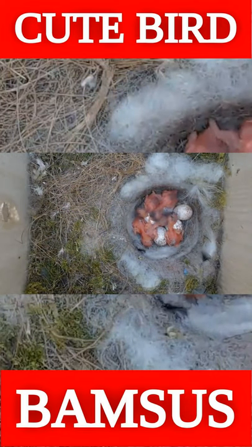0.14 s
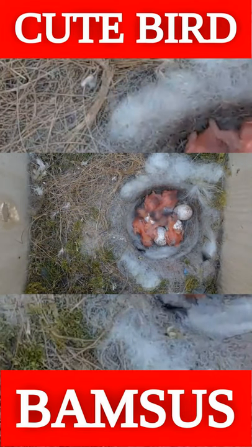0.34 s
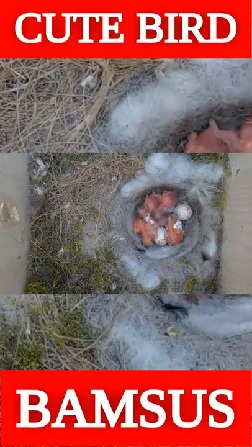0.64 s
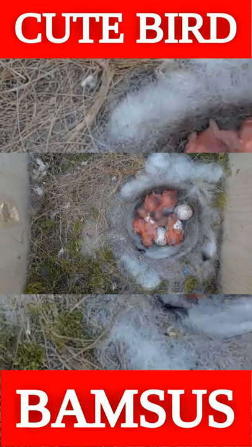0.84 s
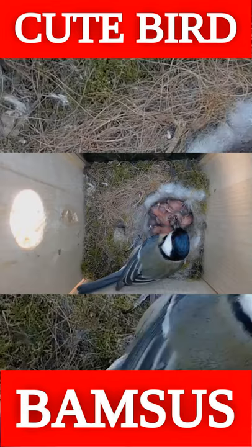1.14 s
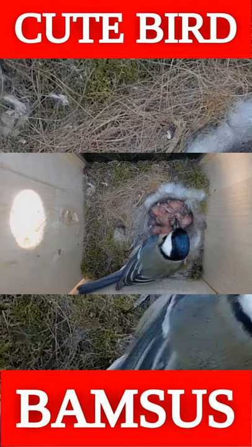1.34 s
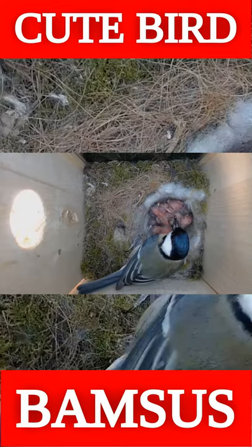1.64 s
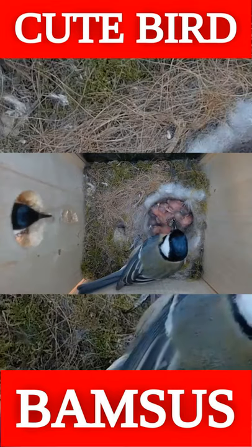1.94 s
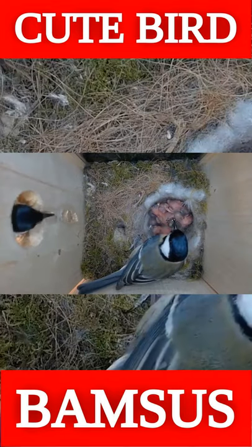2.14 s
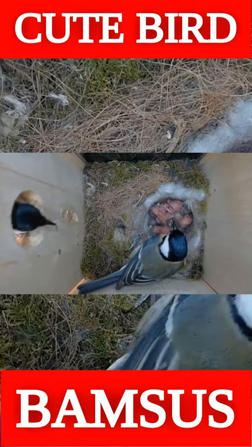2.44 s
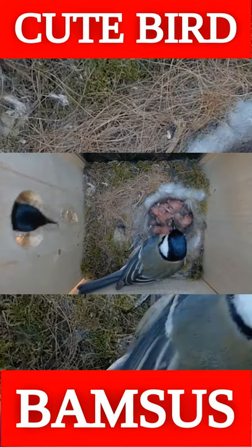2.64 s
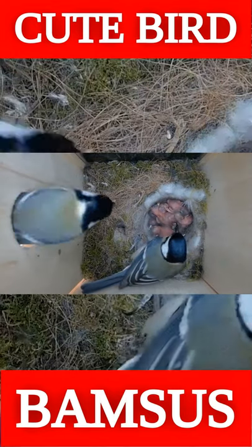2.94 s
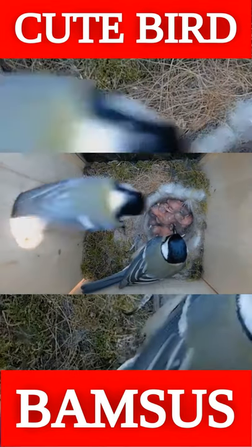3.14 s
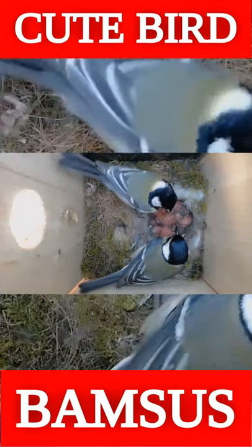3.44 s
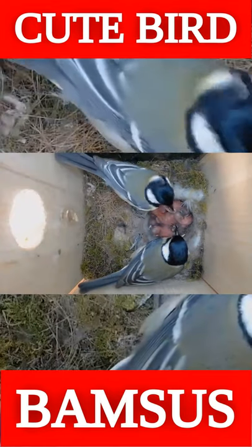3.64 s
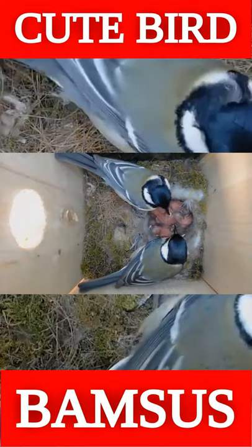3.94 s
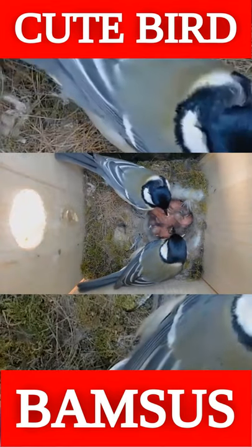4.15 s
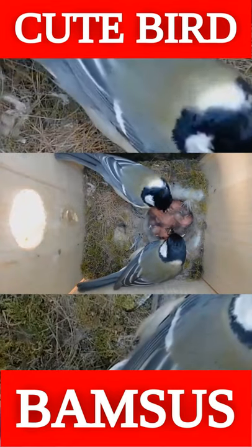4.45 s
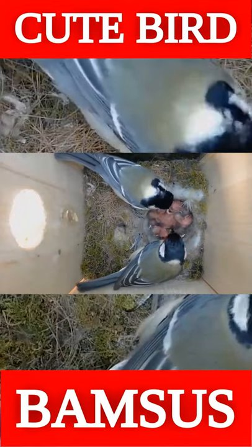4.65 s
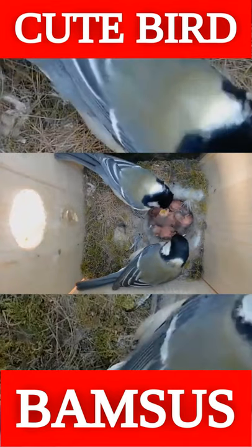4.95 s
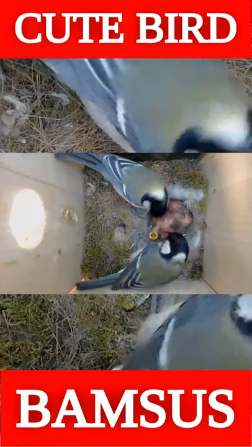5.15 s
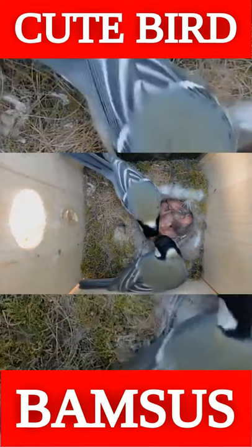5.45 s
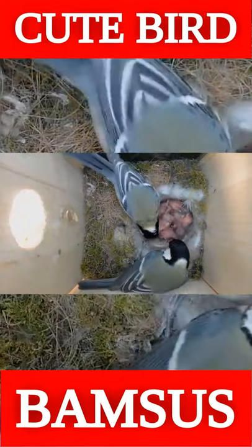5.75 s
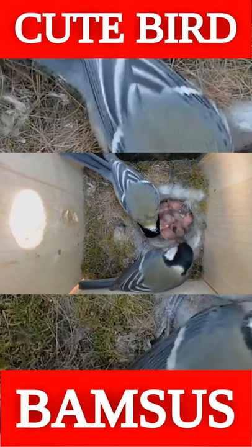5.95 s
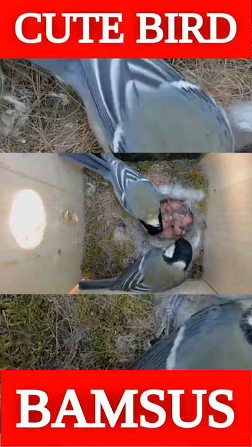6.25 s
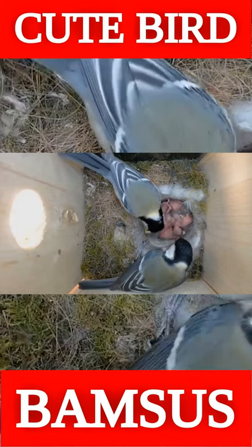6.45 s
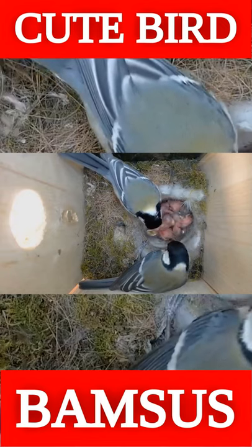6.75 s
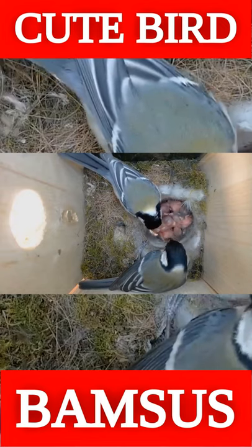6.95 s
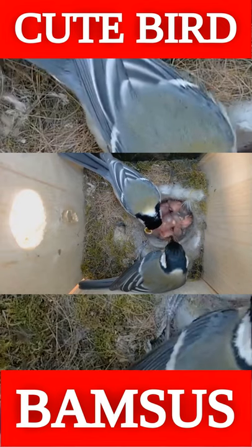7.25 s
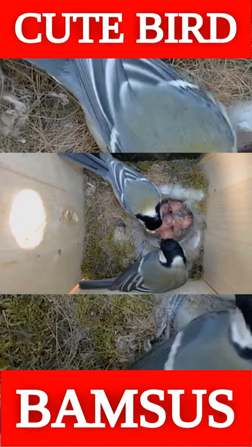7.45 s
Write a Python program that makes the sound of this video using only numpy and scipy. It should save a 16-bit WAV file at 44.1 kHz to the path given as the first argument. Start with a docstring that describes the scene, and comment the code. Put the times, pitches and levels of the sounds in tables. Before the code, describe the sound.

A parent bird arrives in a nest box: after a second of quiet hiss, two strong woody knocks boom through the floor, followed by lighter treads, ticks and a straw rustle. Later landing scuffs are softer. One pure high chirp precedes three rapid groups of buzzy upward calls, the middle one loudest, each trailing into soft breathy hiss. Tiny nestling peeps, faint whine, close microphone.

```python
"""Inside a wooden nest box, close to a small camera microphone: modes, resonances and coloured noise in stereo.
First a bright hiss with faint scuffs; as it ends the level dips briefly, and outdoor air, hum and whine remain.
A parent bird lands at the hole: knocks and scuffs ring wall modes, treads boom, straw grains rustle in the nest.
Then nestlings peep in thin arched sine glides, with two level whistles among the first of them.
Three bursts of raspy rising calls, probably the parent's feeding calls, are frequency-modulated harmonics;
each burst trails into resonant noise."""
import sys
import numpy as np
from scipy import signal
from scipy.fft import rfft, irfft, next_fast_len
from scipy.io import wavfile
from scipy.ndimage import uniform_filter1d

SR = 44100
rng = np.random.default_rng(int(sys.argv[2]) if len(sys.argv) > 2 else 0)


def waveform_to_disk(signal):
    """Save audio, clipped to [-1, 1], as 16-bit WAV at the path in sys.argv[1]."""
    frames = np.transpose(np.atleast_2d(signal))
    scaled = np.clip(frames, -1, 1) * 32767
    samples = np.round(scaled).astype(np.int16)
    wavfile.write(sys.argv[1], SR, samples)


N = 335601
T = np.arange(N) / SR   # time, s

# Levels in the tables are relative; the functions add offsets or normalise the power.
# low rumble, spectrum: [f/Hz, level/dB]
RUMBLE_COLOUR = [(15, -42), (25, -21.5), (38, -15), (70, -9.5), (86, -0.5), (124, 5.5), (162, -1.5),
                 (188, -14), (272, -33), (330, -42.5), (430, -53.5), (730, -120)]
# low rumble in the box, envelope: [t/s, level/dB]
RUMBLE_LEVEL = [(0, -65), (1.17, -66.5), (1.35, -52.5), (1.7, -63), (2.55, -59), (2.9, -70.5), (4.7, -68),
                (5.9, -71), (7.6, -71)]
# outdoor air, spectrum: [f/Hz, level/dB]
AIR_COLOUR = [(150, -44.5), (250, -31.5), (393, -15), (754, -16.5), (983, -4.5), (1090, -5.5), (1270, -0.5),
              (1510, -12), (2330, -17), (2970, -34.5), (6000, -47), (7800, -78), (13200, -120)]
# resonances excited by the outdoor air: [f/Hz, width/Hz, level/dB]
AIR_MODES = [(420, 35, 2), (620, 57, 5.5), (985.3, 4.4, -0.5), (1236, 37, -6), (1836, 97, -7),
             (2292, 51, -7.5)]
# outdoor air dying down, envelope: [t/s, level/dB]
AIR_LEVEL = [(1.15, -62), (2.3, -66.5), (3.0, -72), (4.5, -78), (7.6, -83)]
# brighter hiss of the opening second, spectrum: [f/Hz, level/dB]
OPENING_COLOUR = [(150, -47), (250, -21), (291, -33), (380, -3), (502, -11), (610, -2.5), (829, -8.5),
                  (1280, -2.5), (1410, -6), (1860, -6.5), (5080, -26.5), (7000, -28), (9100, -32.5),
                  (15400, -120)]
# thin fizz on top of the opening hiss, spectrum: [f/Hz, level/dB]
FIZZ_COLOUR = [(3000, -30), (8000, -20), (10500, -6), (12500, -2), (14500, 8), (15400, -1.5)]
# steady electronic floor, spectrum: [f/Hz, level/dB]
FLOOR_COLOUR = [(200, -1), (1500, 1.5), (3000, -6), (5000, -14), (8000, -17.5), (15000, -21)]
# lines of the camera's hum: [f/Hz, r.m.s. level/dB]
HUM = [(1001, -97), (1200, -89), (1599, -92), (1798, -85), (2998, -102)]
# camera whine, envelope: [t/s, level/dB]
WHINE_LEVEL = [(3.2, -90), (4.0, -85), (7.6, -75.5)]
# camera whine, resonances: [f/Hz, width/Hz, level/dB]
WHINE_MODES = [(3370, 64, 9.5), (3400, 120, -19)]
OPENING_DB, OPENING_END_S = -69, 1.125
FRAME_HZ = 30.04   # pictures per second

# single footfalls that thump the floor: [t/s, level/dB]
THUMPS = [(1.209, -27), (1.558, -26), (1.666, -43.5), (2.082, -37), (3.286, -40), (3.376, -41),
          (3.639, -40.5), (4.624, -42), (4.69, -44), (4.936, -46.5), (5.285, -50.5), (5.999, -51.5),
          (7.377, -54)]
# flurries of quick treading: [t/s, duration/s, level/dB]
FLURRIES = [(1.274, .06, -40.5), (1.388, .13, -39.5), (1.902, .06, -40), (2.23, .095, -33)]
TREAD_S, TREAD_SPREAD_DB = 0.0375, 1.2   # interval between treads; standard deviation of their strength
# soft hollow sounds of the nest cup, stirred by movement or by calls: [t/s, duration/s, level/dB]
CUP_STIRS = [(4.123, 0.056, -42), (4.15, .12, -56.5), (4.39, .16, -62.5), (4.707, 0.051, -61),
             (5.348, 0.031, -63.5), (5.423, .13, -57.5), (7.0, 0.04, -67.5)]
# resonances of the hollow of the nest: [f/Hz, width/Hz, level/dB]
CUP_MODES = [(622, 40, 10), (675, 47, 5.5), (887, 29, -6.5), (990, 15, -7)]
CALL_IN_CUP_DB = -41.5   # hollow resonance of the nest cup stirred by each call, relative to the call

# dry straw and feathers: [t/s, duration/s, stalk level/dB, feather swish level/dB]
RUSTLES = [(2.353, 0.036, -49.5, -57), (3.176, 0.27, -72, -74), (3.38, 0.14, -54, -69),
           (3.549, 0.083, -76, -73.5), (3.616, 0.068, -69, -62.5), (3.66, 0.1, -89, -83),
           (3.948, 0.068, -78, -71.5), (4.092, .12, -78, -96), (5.789, 0.041, -76, -86),
           (5.935, 0.036, -76.5, -89.5)]
# resonances of dry straw in the box: [f/Hz, width/Hz, level/dB]
STRAW_MODES = [(1208, 55, -11), (1830, 42, 2.5), (2090, 92, 3.5), (3220, 41, -8.5), (3460, 86, -5),
               (3720, 81, -5.5), (3920, 26, -10), (4230, 68, -12), (4900, 39, -15.5), (5780, 35, -14.5),
               (6460, 71, -18.5), (7380, 41, -25.5)]
# spectra of the stalks and of the feathers: [f/Hz, level/dB]
STALK_COLOUR = [(700, -24.5), (1500, 0.5), (3700, 4.0), (6500, -6.5), (8300, -42.0)]
FEATHER_COLOUR = [(1000, -17), (2500, -5.5), (3700, -4), (5500, 0), (7500, -2.0), (8300, -36.0)]

# claws and beak on the wall: [t/s, level/dB, hollow lows/dB, woody mids/dB, crack/dB]
KNOCKS = [(1.2109, -23, 4, -15.5, -3), (1.558, -16, 2.5, 0.5, -2), (2.073, -57, -21, 12, 18.5),
          (2.082, -57, -21, -1, 24.5), (2.3687, -25.5, 1, -3.5, 1.5), (2.38, -33, 4.5, -0.5, -32),
          (3.636, -62, -6, 8, 2), (3.657, -42.5, -11, 1.5, 15.5), (4.128, -47.5, -30, -2, -7)]
# wings and feet scuffing the walls: [t/s, duration/s, level/dB]
SCUFFS = [(0.256, 0.041, -63.5), (0.65, 0.077, -65), (1.884, 0.12, -57.5), (3.257, 0.079, -44),
          (3.358, 0.081, -49), (3.618, 0.071, -43.5), (5.402, 0.15, -64)]
# modes of the wooden box: [f/Hz, level/dB, 60 dB decay time/s, left minus right/dB]
WOOD_MODES = [(370, -8, 0.06, 2.5), (433, -10.5, 0.11, 2), (490, -14.5, 0.064, 1.5), (634, -8, 0.087, 2),
              (837, -15.5, 0.091, 0.5), (977, -8.5, 0.078, -3.5), (1265, -2, 0.084, -1.5),
              (1365, -2.5, 0.055, 0), (1496, -13.5, 0.08, 1.5), (1584, -14, 0.03, 0.5),
              (1865, -12, .045, -0.5), (2190, -21, 0.057, 2), (2431, -19.5, 0.095, 2),
              (2770, -32.5, 0.066, 4), (3700, -42.5, .046, 3), (3900, -31, 0.042, 1),
              (5170, -34, 0.046, -1.5)]
# crack of a knock, spectrum: [f/Hz, level/dB]
CRACK_COLOUR = [(300, -7.5), (1300, -9), (2500, -4), (4000, -22.5), (5500, -25), (7500, -42), (9000, -70),
                (15000, -64.5)]
# spectra of the scuffing grit and of the beak snap: [f/Hz, level/dB]
GRIT_COLOUR = [(300, 8.0), (600, 2.5), (1000, 4.0), (1300, -2.5), (2100, 7), (4000, -22.0)]
SNAP_COLOUR = [(3000, -16.5), (8000, 8), (12000, -5), (15000, -13)]
# the claws slide around each knock: lead, duration, and levels relative to the knock
SLIDE_LEAD_S, SLIDE_S, SLIDE_WOOD_DB, SLIDE_STRAW_DB = 0.011, 0.055, -18, -44

# hisses trailing the bursts: [t/s, duration/s, throat band level/dB, hiss level/dB]
HISSES = [(4.861, 0.25, -89, -65), (5.379, 0.14, -65, -59), (5.492, 0.13, -58, -60),
          (7.256, 0.15, -53, -67), (7.385, 0.11, -60, -68.5)]
# resonances of the throat band: [f/Hz, width/Hz, level/dB]
THROAT_MODES = [(1337, 110, -1.5), (1608, 60, -6.5), (1920, 60, 5.5), (2130, 66, 3)]
# resonances of the hiss: [f/Hz, width/Hz, level/dB]
HISS_MODES = [(3260, 40, 1), (3430, 47, -1.5), (3946, 130, 0), (4780, 52, 4.5), (5100, 80, -6.5),
              (4950, 18, -1), (5410, 35, -17.5), (6000, 68, -19)]
# smooth part of the hiss, spectrum: [f/Hz, level/dB]
HISS_COLOUR = [(1530, -64.5), (2600, -2), (2930, -43), (3080, 1), (3260, 16.5), (3600, -20), (3900, 23.5),
               (4300, 10), (5050, 19.5), (5390, -46.5), (5510, -29.5), (6680, -31), (7530, -38),
               (9790, -65.5), (16600, -120)]
HISS_TAPER = 0.98   # exponent of the sine envelope
HELD_HZ, HELD_DB = 1826, 2.5   # weak tone inside each hiss; level added to the throat band's table level

# arched nestling peeps: [t/s, duration/s, top f/Hz, level/dB]
PEEPS = [(3.224, .016, 5430, -62.5), (3.24, 0.017, 7260, -60), (5.313, 0.031, 6750, -61),
         (5.52, 0.04, 6650, -71), (5.656, 0.065, 7490, -63), (5.943, 0.064, 6560, -72.5),
         (6.176, 0.06, 7480, -67), (6.654, 0.042, 7030, -68), (7.407, 0.059, 7260, -57.5)]
# level whistles on one mean pitch: [t/s, duration/s, level/dB]
WHISTLES = [(3.978, 0.051, -41), (4.14, 0.077, -73.5)]
WHISTLE_HZ = 5117
SAG_HZ_PER_S = 22000   # the longer a peep, the further its ends lie below its top

# bursts of raspy rising calls, each burst in one voice:
# [first f/Hz, last f/Hz, overtone level/dB, rasp 0-1, calls as (t/s, duration/s, level/dB)]
CALL_BURSTS = [(1454, 1910, -1.5, 0.76, [(4.698, 0.039, -36.5), (4.758, 0.044, -34.5),
               (4.824, 0.053, -33.5)]), (1291.3, 1880, -5.5, .48, [(5.148, 0.028, -29),
               (5.196, 0.041, -23.5), (5.261, .045, -23.5), (5.339, .05, -24)]),
               (1255, 1800, -9.5, 0.46, [(7.071, .037, -29), (7.136, 0.046, -25.5), (7.218, 0.047, -26.5)])]
# air resonances of the box excited by the calls: [f/Hz, width/Hz, level/dB]
BOX_AIR = [(1292, 55, -3), (1400, 38, -3), (1565, 26, 1), (1767, 40, -4), (1927, 80, -1), (2030, 45, -7),
           (2193, 25, -11), (2827, 25, -6), (2965, 60, -6), (3327, 28, 4), (3626, 45, -2), (3778, 43, -2),
           (4400, 150, -2), (4974, 45, 3), (5720, 90, -5), (6300, 90, -3)]
# colour of the overtones: [f/Hz, level/dB]
OVERTONE_COLOUR = [(1500, -15), (2300, 3.5), (2600, -1), (3300, 0), (4300, 4.5), (5100, 1), (5700, -1.5),
                   (6600, -3), (7400, -8.5), (8300, -54)]
RASP_DEPTH, RASP_AT_ONSET = 0.19, 0.35   # relative pitch scatter at full effort and rasp; share of it at the start

# spectral lean at the microphone: [f/Hz, left minus right/dB]
LEAN = [(100, -.4), (500, -1), (850, -2), (1300, 1), (1700, 1.5), (2100, 4), (2700, 3), (3400, -1),
        (4500, -1.5), (7000, 0)]
CUTOFF_HZ = 15500


def from_db(db):
    """Logarithmic level: decibels to amplitude ratio."""
    return 10 ** (np.asarray(db) / 20)


def rms_one(x):
    """Normalisation to unit mean power."""
    return x / np.sqrt(np.mean(x ** 2) + 1e-20)


def colour(x, points):
    """Linear filtering by a gain curve, interpolated in level against log frequency."""
    hz, db = np.transpose(points)
    size = next_fast_len(len(x) + 2000)
    f = np.maximum(np.arange(size // 2 + 1) * SR / size, 1)
    gain = from_db(np.interp(np.log(f), np.log(hz), db))
    return irfft(rfft(x, size) * gain, size)[:len(x)]


def noise(points):
    """Spectral shaping: white noise filtered to a curve, at unit power."""
    return rms_one(colour(rng.standard_normal(N), points))


def band(x, low_hz, high_hz):
    """Band limitation by a steep causal filter."""
    sos = signal.butter(4, [low_hz, min(high_hz, 0.45 * SR)], "band", fs=SR, output="sos")
    return signal.sosfilt(sos, x)


def flutter(hz):
    """Random modulation: low-passed noise of unit spread."""
    return rms_one(signal.sosfilt(signal.butter(2, hz, fs=SR, output="sos"), rng.standard_normal(N)))


def resonate(x, modes):
    """Superposition of parallel damped resonances; bandwidth sets the pole radius."""
    out = 0
    for hz, width, db in modes:
        r = np.exp(-np.pi * width / SR)
        poles = [1, -2 * r * np.cos(2 * np.pi * hz / SR), r * r]
        out = out + from_db(db) * (1 - r * r) / 2 * signal.lfilter([1, 0, -1], poles, x)
    return out


def ring(x, hz, t60):
    """Impulse response of one mode: a unit click starts an exponentially decaying sine."""
    r, w = np.exp(-np.log(1000) / (t60 * SR)), 2 * np.pi * hz / SR
    return signal.lfilter([0, np.sin(w)], [1, -2 * r * np.cos(w), r * r], x + 1e-18)


def clicks(times, db):
    """Impulsive excitation: one scaled impulse per event."""
    return np.bincount((times * SR).astype(int), from_db(db), N)[:N]


def swells(times, lengths, levels_db, taper=1.4):
    """Amplitude envelope: a half-sine raised to a power for each event."""
    out = np.zeros(N)
    for s, length, db in zip(times, lengths, levels_db):
        part = out[int(s * SR):int((s + length) * SR)]
        part += from_db(db) * np.abs(np.sin(np.linspace(0, np.pi, len(part)))) ** taper
    return out


def pan(x, db):
    """Interchannel level difference, left minus right."""
    return x * from_db([[db / 2], [-db / 2]])


def reflections(x, t60):
    """Diffuse reverberation: convolution with exponentially decaying noise of unit energy."""
    t = T[:SR // 6]
    tail = rng.standard_normal(len(t)) * np.exp(-np.log(1000) * t / t60)
    return signal.fftconvolve(x, tail / np.linalg.norm(tail))[:N]


def calls():
    """Source grouping: each call as (t/s, duration/s, level/dB, first f/Hz, last f/Hz, overtones/dB, rasp)."""
    return [(*call, *voice) for *voice, burst in CALL_BURSTS for call in burst]


def slides(db):
    """Frictional envelope: a short swell around each knock, in proportion to its level."""
    events = [(s - SLIDE_LEAD_S, SLIDE_S, knock_db + db) for s, knock_db, *_ in KNOCKS]
    return swells(*np.transpose(events))


def treads():
    """Periodic excitation: each flurry is a run of evenly paced pushes, (t/s, level/dB)."""
    pushes = []
    for s, length, db in FLURRIES:
        for after in np.arange(0, length, TREAD_S):
            pushes.append((s + after, db + TREAD_SPREAD_DB * rng.standard_normal()))
    return pushes


def background(rumble_db=2, air_db=1, fizz_db=-83, floor_db=-83):
    """Noise and modulation: air colours the box; the camera hisses and hums, its whine pulses once per picture."""
    rumble_level = np.interp(T, *np.transpose(RUMBLE_LEVEL)) + rumble_db + 2.7 * flutter(27)
    rumble = noise(RUMBLE_COLOUR) * from_db(rumble_level)

    outside = noise(AIR_COLOUR)
    air_gain = from_db(np.interp(T, *np.transpose(AIR_LEVEL)) + air_db)
    air = rms_one(0.2 * outside + resonate(outside, AIR_MODES)) * air_gain
    opening = noise(OPENING_COLOUR) * from_db(OPENING_DB) + noise(FIZZ_COLOUR) * from_db(fizz_db)

    hum = 0
    for hz, db in HUM:
        hum = hum + np.sqrt(2) * from_db(db) * np.sin(2 * np.pi * hz * T + 0.5 * flutter(10))
    pulse = 0.5 + 0.5 * np.cos(2 * np.pi * FRAME_HZ * (T - 0.004))
    whine = rms_one(band(resonate(rng.standard_normal(N), WHINE_MODES), 3050, 3850))
    whine = whine * pulse * from_db(np.interp(T, *np.transpose(WHINE_LEVEL)))

    # noise in opposite phase on the two sides widens the floor
    width = pan(noise(FLOOR_COLOUR), db=-1.5) * [[1], [-1]] * from_db(-93.5)
    floor = from_db(floor_db) * noise(FLOOR_COLOUR) + width
    return rumble + np.where(T < OPENING_END_S, opening, air + whine + hum) + floor


def nest_floor(thump_db=0, flex_db=-8):
    """Modal excitation: pushes through springy moss boom in the floor; movement and calls stir the nest hollow."""
    push = clicks(*np.transpose(THUMPS + treads()))
    # two resonances in series let the boom build up gradually
    boom = 2 * resonate(ring(push, hz=145.95, t60=0.085), [(141.0, 36, 0.0041)])
    flex = from_db(flex_db) * band(ring(push, hz=85.0, t60=0.077), 45, 110)
    stirred = CUP_STIRS + [(s, length, db + CALL_IN_CUP_DB) for s, length, db, *_ in calls()]
    hollow = rms_one(band(resonate(rng.standard_normal(N), CUP_MODES), 520, 1400))
    hollow = hollow * swells(*np.transpose(stirred))
    return from_db(thump_db) * (boom + flex) + pan(hollow, db=2.0)


def straw(grain_db=4.0):
    """Granular excitation: stalks give way in clumps under the parent's feet; feathers swish over them."""
    s, length, stalks_db, feather_db = np.transpose(RUSTLES)
    grains = rng.standard_normal(N) * from_db(grain_db * flutter(500))
    stalks = rms_one(colour(resonate(grains, STRAW_MODES), STALK_COLOUR))
    feathers = rms_one(colour(grains, FEATHER_COLOUR))
    stalk_envelope = swells(s, length, stalks_db) + slides(SLIDE_STRAW_DB)
    return stalks * stalk_envelope + feathers * swells(s, length, feather_db)


def wood(knock_db=-0.5, crack_db=-3, scuff_db=0, snap_db=-36):
    """Modal superposition: knocks and gritty scuffs drive the same modes of the walls."""
    s, db, hollow_db, mids_db, hard_db = np.transpose(KNOCKS)
    grit = colour(rng.standard_normal(N) * from_db(4 * flutter(250)), GRIT_COLOUR)
    struck, rubbed = 0, 0
    for k, (hz, mode_db, t60, side_db) in enumerate(WOOD_MODES):
        sign = (-1) ** k   # neighbouring modes alternate in phase
        emphasis_db = hollow_db * (hz < 550) + mids_db * (1150 < hz < 2000)
        # each blow excites each mode with a random spread of 1 dB
        blows = clicks(s, db + mode_db + emphasis_db + rng.standard_normal(len(s)))
        struck = struck + pan(ring(blows, hz, t60), side_db) * sign
        rubbed = rubbed + pan(ring(grit, hz, t60), side_db) * from_db(mode_db) * sign
    crack = colour(reflections(clicks(s, db + hard_db), t60=0.079), CRACK_COLOUR)
    crack = crack * from_db(crack_db + 24.0)
    # a beak snaps shut: one bright tick that dies between the walls
    snap = colour(reflections(clicks(np.array([5.158]), [snap_db]), t60=0.11), SNAP_COLOUR)
    scuff_envelope = swells(*np.transpose(SCUFFS)) + slides(SLIDE_WOOD_DB)
    scuffs = from_db(scuff_db) * rms_one(rubbed) * scuff_envelope
    return from_db(knock_db) * struck + crack + snap + scuffs


def hisses(hiss_db=0, smooth_db=-11, throat_db=-2):
    """Turbulence shaped by resonance: the open beak goes on hissing softly after each burst."""
    throat = rms_one(resonate(band(rng.standard_normal(N), 1130, 1900), THROAT_MODES)) * from_db(throat_db)
    reedy = rms_one(band(resonate(rng.standard_normal(N), HISS_MODES), 3000, 6500))
    hiss = rms_one(reedy + from_db(smooth_db) * noise(HISS_COLOUR))
    hiss = hiss * from_db(hiss_db + 1.2 * flutter(120))
    s, length, low_db, high_db = np.transpose(HISSES)
    return throat * swells(s, length, low_db, HISS_TAPER) + hiss * swells(s, length, high_db, HISS_TAPER)


def held_tones(waver_hz=42, echo_db=-5):
    """Random frequency modulation: within each hiss the voice lingers on a weak, unsteady pitch."""
    s, length, throat_db, _ = np.transpose(HISSES)
    phase = 2 * np.pi * np.cumsum(HELD_HZ + waver_hz * flutter(370)) / SR
    out = swells(s, length, throat_db + HELD_DB) * np.sin(phase)
    return pan(out + from_db(echo_db) * reflections(out, t60=0.07), db=-4)


def peeps(waver_hz=45, echo_db=-6):
    """Sinusoidal glide: nearly pure whistles, most rising and falling along a parabola."""
    out, waver = np.zeros(N), flutter(200)
    arched = [(s, length, hz, SAG_HZ_PER_S * length, db) for s, length, hz, db in PEEPS]
    level = [(s, length, WHISTLE_HZ, 0, db) for s, length, db in WHISTLES]
    for s, length, top_hz, sag_hz, db in arched + level:
        at = slice(int(s * SR), int((s + length) * SR))
        u = np.linspace(-1, 1, at.stop - at.start)
        pitch = top_hz - sag_hz * u * u + waver_hz * waver[at]
        out[at] += from_db(db) * (1 - u * u) * np.sin(2 * np.pi * np.cumsum(pitch) / SR)
    return out + from_db(echo_db) * reflections(out, t60=0.036)


def raspy_calls(rasp_hz=800, shimmer_db=5.0, fall_db=-7.5, swell=0.46, direct_db=-10, echo_db=-12, spit_db=-12):
    """Source and resonator: rising calls grow harsher and richer in overtones as effort peaks, and ring the box."""
    low, high = np.zeros(N), np.zeros(N)
    wobble, shimmer = flutter(rasp_hz), from_db(shimmer_db * flutter(540))
    spit = from_db(spit_db) * 2 * rng.standard_normal(N)
    spans = []
    for s, length, db, first_hz, last_hz, over_db, rasp in calls():
        at = slice(int(s * SR), int((s + length) * SR))
        u = np.linspace(0, 1, at.stop - at.start)
        effort = np.abs(np.sin(np.pi * u ** 1.71))
        scatter = RASP_DEPTH * rasp * (RASP_AT_ONSET + (1 - RASP_AT_ONSET) * effort)
        pitch = (first_hz + (last_hz - first_hz) * u ** 1.05) * (1 + scatter * wobble[at])
        phase = 2 * np.pi * np.cumsum(pitch) / SR
        low[at] = np.sin(phase) * np.abs(np.sin(np.pi * u)) ** 0.12 * shimmer[at]
        # harmonics 2 to 5, with fixed phase offsets
        overtones = sum(from_db(fall_db * (k - 2.5)) * np.sin(k * phase + k * k) for k in range(2, 6))
        high[at] = (overtones + spit[at]) * effort ** swell * shimmer[at]
        spans.append((at, db, db + over_db))

    fundamental = band(band(low, 1153, 2600), 1153, 2600)
    voice = []
    for k, part in enumerate([fundamental, colour(high, OVERTONE_COLOUR)]):
        echo = from_db(echo_db) * reflections(part, t60=0.081)
        boxed = from_db(direct_db) * part + resonate(part, BOX_AIR) + echo
        # each gain holds until the next call begins, so the ring keeps the call's strength
        gain = np.zeros(N)
        for at, *levels in spans:
            gain[at.start:] = from_db(levels[k] - 5.0) / np.std(boxed[at])
        voice.append(boxed * uniform_filter1d(gain, size=200))
    return pan(voice[0], db=-1.5) + pan(voice[1], db=0.0)


def scene(wall_db=-17, wall_lag_s=0.00024):
    """Superposition and early reflection: all sources sum at a microphone whose sides differ in colour."""
    dip = 1 - ((T > OPENING_END_S) & (T < 1.15))   # the background drops out briefly as the opening hiss ends
    surroundings = background() * dip + nest_floor() + straw() + wood()
    left, right = surroundings + hisses() + held_tones() + peeps() + raspy_calls()
    # a near wall's delayed reflection reaches the two sides with opposite sign
    wall = from_db(wall_db) * np.interp(T - wall_lag_s, T, band((left + right) / 2, 500, 9000))
    hz, lean_db = np.transpose(LEAN)
    left = colour(left + wall, np.c_[hz, lean_db / 2])
    right = colour(right - wall, np.c_[hz, -lean_db / 2])
    return np.array([left, right])


def record(dry):
    """Band limitation: a steep elliptic low-pass cuts the top."""
    return signal.sosfilt(signal.ellip(10, 0.1, 80, CUTOFF_HZ, fs=SR, output="sos"), dry)


dry = scene()
out = record(dry)
waveform_to_disk(out)
```